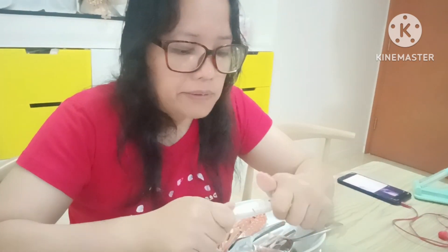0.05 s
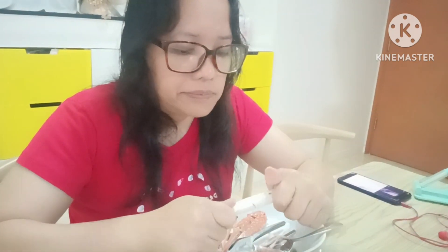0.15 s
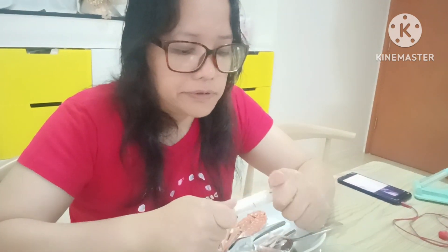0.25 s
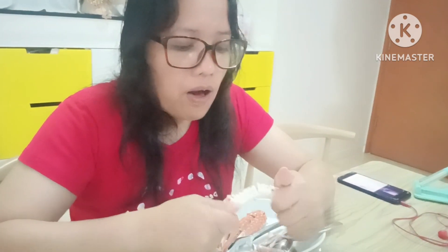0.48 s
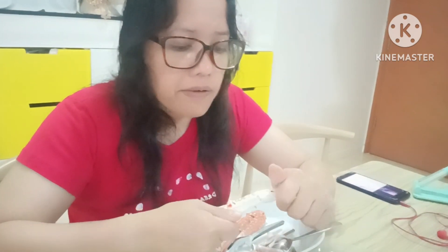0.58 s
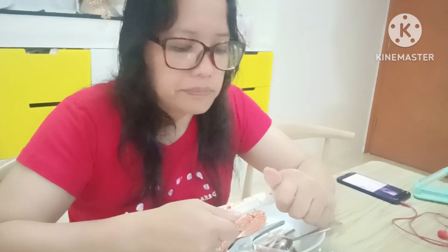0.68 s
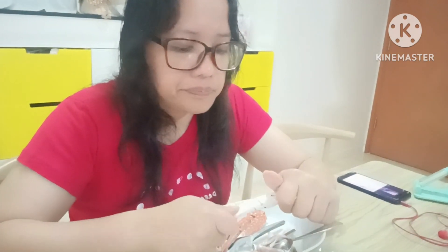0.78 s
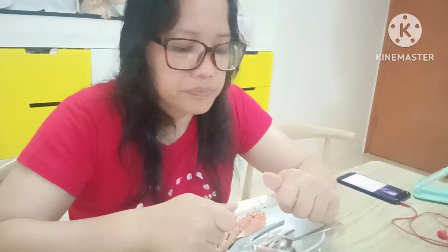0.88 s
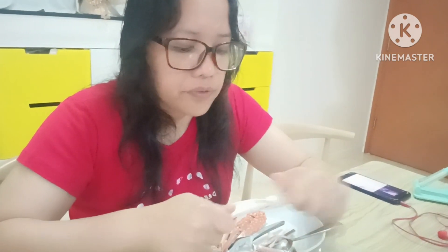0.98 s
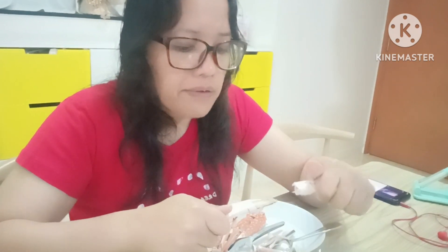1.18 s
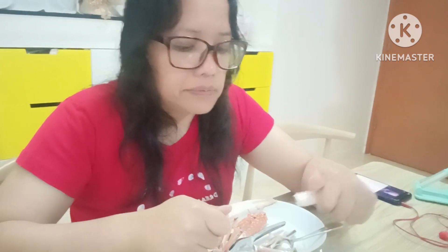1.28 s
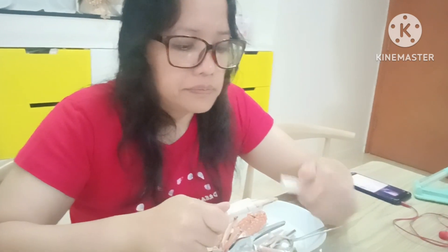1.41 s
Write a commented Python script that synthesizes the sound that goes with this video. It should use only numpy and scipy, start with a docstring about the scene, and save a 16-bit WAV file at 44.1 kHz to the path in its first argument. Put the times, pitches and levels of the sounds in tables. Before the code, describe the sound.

A cooked crab leg shell snaps sharply in the hands, with small crackles before and after

```python
"""A cooked crab leg snaps between two hands at a table, close to a phone: five fractures in 6 ms.
Each fracture rings decaying shell modes and spits noise; a hard-walled room adds a long tail and a far-wall echo.
Ticks of shell and faint rings of plate and table, shaped from filtered noise, sound before and after the snap.
The tail of an earlier crackle opens the scene. An appliance hums on wavering sine lines over patchy room noise,
and handling rustles in the treble."""
import sys
import numpy as np
from scipy import signal
from scipy.fft import rfft, irfft, next_fast_len
from scipy.io import wavfile
from scipy.ndimage import uniform_filter1d, map_coordinates

SR = 44100
rng = np.random.default_rng(int(sys.argv[2]) if len(sys.argv) > 2 else 0)


def gain_from_decibels(decibels):
    """Convert decibel values to linear amplitude factors."""
    exponent = np.asarray(decibels, float) / 20
    return 10 ** exponent


def master_out(mix):
    """Clip the mix to full scale and print it as 16-bit PCM to the path in sys.argv[1]."""
    frames = np.transpose(np.atleast_2d(mix))
    ceiling = np.clip(frames, -1, 1)
    pcm = np.round(ceiling * 32767).astype(np.int16)
    wavfile.write(sys.argv[1], SR, pcm)


N = 63945


def unit(x):
    """Scales x to rms 1."""
    return x / np.sqrt(np.mean(x ** 2) + 1e-20)


def along(points, hz):
    """Interpolates (Hz, value) points on a log frequency axis."""
    point_hz, value = np.transpose(points)
    return np.interp(np.log(hz + 1), np.log(point_hz + 1), value)


def filtered(x, response):
    """Multiplies the spectrum of x by a response of frequency."""
    size = next_fast_len(len(x) + 8192)
    hz = np.fft.rfftfreq(size, 1 / SR)
    return irfft(rfft(x, size) * response(hz), size)[:len(x)]


def wobble(knots_per_s):
    """Smooth random curve: a spline through normal draws."""
    knots = rng.standard_normal(int(N * knots_per_s / SR) + 4)
    return map_coordinates(knots, [np.arange(N) * knots_per_s / SR])


def add(track, start_s, piece):
    """Mixes a piece into the track, cut at the track's end."""
    part = track[round(start_s * SR):][:len(piece)]
    part += piece[:len(part)]


def patchy(colour, patch_db):
    """Coloured noise whose gain varies by patch_db rms in patches of time and frequency."""
    z = signal.stft(rng.standard_normal(N), nperseg=512)[2]
    field = uniform_filter1d(rng.standard_normal(z.shape), 5, axis=0)
    field = uniform_filter1d(field, 8, axis=1)
    noise = signal.istft(z * gain_from_decibels(patch_db * unit(field)), nperseg=512)[1][:N]
    return filtered(noise, lambda hz: gain_from_decibels(along(colour, hz)))


# Room noise spectrum. Each row: frequency in Hz, relative density in dB per Hz.
AIR_COLOUR = [(13, -62), (25, -30), (45, -12.5), (64, -5), (100, -7.5), (142, -10), (170, -10),
              (230, -14.5), (299, -13.5), (340, -15.5), (404, -21), (520, -20), (700, -20.5), (1000, -17.5),
              (1280, -19), (1700, -23.5), (2280, -25.5), (3000, -26.5), (3840, -39.5), (5000, -45.5),
              (6500, -54), (9260, -49.5), (15600, -59)]


def air():
    """Broad room noise, patchy and wavering in level."""
    noise = patchy(AIR_COLOUR, patch_db=1.55)
    rms_above_220_hz = np.std(filtered(noise, lambda hz: hz > 220))
    return gain_from_decibels(-54 + 0.88 * wobble(30)) * noise / rms_above_220_hz


# Appliance lines. Each row: frequency in Hz, nominal level in dB rms.
HUM_LINES = [(199.9, -53.5), (300.5, -67.5), (349.6, -67.5), (398.4, -69.5), (598.5, -69.5)]


def hum():
    """Appliance hum: sine lines wavering in level and phase."""
    waver_db, drift_rad = 1.5, 0.2
    rms_to_peak_db = 2.5  # a little under a steady sine's 3 dB
    t = np.arange(N) / SR
    out = np.zeros(N)
    for hz, rms_db in HUM_LINES:
        level = gain_from_decibels(rms_db + rms_to_peak_db + waver_db * wobble(25))
        phase = 2 * np.pi * (hz * t + rng.random()) + drift_rad * wobble(5)
        out += level * np.sin(phase)
    return out


# Rustle level curve. Each row: time in seconds, level in dB before the flutter.
RUSTLE_LEVEL = [(0, -64), (.1, -66.5), (.2, -73.5), (.6, -78.5), (.86, -79.5), (.9, -73), (.98, -70.5),
                (1.06, -73), (1.1, -75), (1.2, -78.5), (1.45, -77)]
# Rustle spectrum. Each row: frequency in Hz, relative density in dB per Hz.
RUSTLE_COLOUR = [(2060, -29.5), (3500, -3), (5220, -15.5), (6260, -22.5), (7010, -15), (8090, -8.5),
                 (9760, -0.5), (11800, -18.5), (15600, -22)]


def rustle():
    """Handling rustle: patchy treble noise on a level curve with fast flutter."""
    t = np.arange(N) / SR
    level_db = np.interp(t, *np.transpose(RUSTLE_LEVEL)) + 2.7 * wobble(120)
    return gain_from_decibels(level_db) * unit(patchy(RUSTLE_COLOUR, patch_db=2.5))


# Faint rings of plate and table, the lowest three from the table.
# Each row: start in seconds, rms level before the envelope in dB, centre in Hz,
# half-width at half amplitude in Hz, fade length in seconds.
RINGS = [(0.225, -43, 100, 30, 0.026), (.25, -51.5, 142, 25, 0.086), (.25, -51.5, 267, 60, 0.066),
         (0.443, -58, 4770, 250, 0.041), (.441, -47, 2900, 500, 0.016), (0.578, -58.5, 2450, 147, 0.066),
         (.64, -74.5, 5180, 350, .11), (.905, -71.5, 7000, 250, 0.047), (0.909, -62.5, 3900, 900, 0.055),
         (1.002, -54, 2920, 300, 0.037), (1.085, -57, 3270, 300, 0.022), (1.107, -71.5, 9100, 800, 0.043),
         (1.26, -76.5, 9300, 900, .03)]


def rings():
    """Faint rings of plate and table: narrow noisy resonances that start within 3 ms and fade."""
    t = np.arange(SR // 4) / SR
    out = np.zeros(N)
    for start_s, db, centre_hz, width_hz, fade_s in RINGS:
        noise = rng.standard_normal(len(t))
        tone = filtered(noise, lambda hz: 1 / (1 + ((hz - centre_hz) / width_hz) ** 2))
        envelope = np.clip(t / 0.003, 0, 1) * np.exp(-(t / fade_s) ** 3)
        add(out, start_s, gain_from_decibels(db) * unit(tone) * envelope)
    return out


# Room decay. Each row: frequency in Hz, t60 in seconds.
ROOM_T60 = [(300, .4), (1500, 0.51), (3400, 0.53), (6000, 0.53), (10000, 0.44), (15000, .55)]


def room(colour):
    """Room tail of energy 1: each frequency dies at its own speed, the far wall adds a late lump."""
    gap_s, rise_s = 0.004, 0.0029
    echo_s, echo_db, echo_t60_s = 0.0475, 3, 0.025  # level relative to the tail
    hz, t, z = signal.stft(rng.standard_normal(SR), SR, nperseg=256)
    decay_db = -60 * t / along(ROOM_T60, hz)[:, None]
    z = z * gain_from_decibels(along(colour, hz)[:, None] + decay_db)
    tail = signal.istft(z, SR, nperseg=256)[1][:SR]
    t = np.arange(SR) / SR
    onset = np.clip((t - gap_s) / rise_s, 0, 1)
    echo = (t > echo_s) * gain_from_decibels(echo_db - 60 * abs(t - echo_s) / echo_t60_s)
    tail = tail * onset * (1 + echo)
    return tail / np.linalg.norm(tail)


# Small ticks of cracking shell. Each row: start in seconds, rms level before the envelope in dB,
# centre in Hz, spectral width (Gaussian sigma) in octaves, fade length in seconds.
TICKS = [(.0872, -47.5, 11000, 1.8, .004), (0.44, -43, 5000, 1.1, 0.0026), (0.467, -48, 12050, .6, 0.0044),
         (0.4765, -39, 4950, 3.9, .006), (0.498, -48, 9000, 1.1, 0.0033), (.8984, -53, 5260, .3, 0.0043),
         (.8986, -55.5, 9300, .12, 0.0046), (.907, -55, 9300, .2, 0.0022), (.9155, -62, 7040, 1.1, .003),
         (.9225, -57, 7000, 1.1, .003), (.930, -61, 8030, 1.1, .003), (0.945, -55.5, 9300, 0.13, 0.0026),
         (0.95, -63, 11000, .8, .003), (1.006, -57, 2740, .4, .003), (1.0113, -58.5, 5530, 0.86, 0.0036),
         (1.0144, -50.5, 3850, .35, 0.0035), (1.02, -57, 3000, 0.4, 0.006),
         (1.026, -50, 3430, 0.24, 0.0049), (1.037, -50, 2920, 0.27, .003), (1.0715, -57, 12000, 1.4, .004),
         (1.0789, -47, 2620, 0.42, .004), (1.103, -56, 1300, 0.17, 0.0058), (1.156, -67, 4300, .2, .005)]
# Colour common to all ticks. Each row: frequency in Hz, gain in dB.
GRIT_COLOUR = [(500, -8), (1500, -0.5), (3200, 1), (5000, -4.5), (6500, -11), (8000, -6), (9800, 3),
               (11500, -4.5), (13500, -5.5), (15600, -3.5)]


def ticks():
    """Gritty noise bursts of cracking shell, each with its own colour and room answer."""
    rise_s, wet_db = 0.00024, -6.5
    t = np.arange(1024) / SR
    out = np.zeros(N)
    for start_s, db, centre_hz, width_octaves, fade_s in TICKS:
        def response(hz):
            octaves = np.log2((hz + 1) / centre_hz)
            return gain_from_decibels(along(GRIT_COLOUR, hz)) * np.exp(-0.5 * (octaves / width_octaves) ** 2)
        grit = filtered(rng.standard_normal(len(t)), response)
        envelope = np.clip(t / rise_s, 0, 1) * np.exp(-(t / fade_s) ** 3)
        burst = gain_from_decibels(db) * unit(grit) * envelope
        add(out, start_s, burst)
        flat_room = room([(100, 0)])
        add(out, start_s, gain_from_decibels(wet_db) * signal.fftconvolve(burst, flat_room))
    return out


def earlier_crackle():
    """Room tail of a crackle 0.12 s before the start, still dying away."""
    out = np.zeros(N)
    add(out, 0, gain_from_decibels(-17.5) * room(GRIT_COLOUR)[round(0.12 * SR):])
    return out


# Fractures of the snap. Each row: start in seconds, level of ring and spit together in dB.
FRACTURES = [(0.2242, -5.5), (.2256, -13), (.22658, -10.5), (0.2275, -14.5), (.2301, -25.5)]
# Shell modes. Each row: frequency in Hz, relative level in dB, t60 in seconds.
SHELL_MODES = [(106.3, -33.5, .06), (729, -14.5, 0.019), (1050, -15.5, 0.017), (1607, -10, .025),
               (2365, -12.5, 0.019), (3062, -6.5, .018), (3700, -10, .012), (4860, -11.5, .01),
               (5710, -11, .014), (7320, -12, .012), (8890, 1, 0.009), (10360, 1.5, 0.0086),
               (11300, -5.5, .009), (13000, -9, .007), (15000, -8, .007)]
# Colour of the spit and of the snap's room tail. Each row: frequency in Hz, relative density in dB per Hz.
SNAP_COLOUR = [(90, -60.5), (130, -17.5), (330, -17), (500, -29.5), (750, -21.5), (1050, -9.5), (1320, -24),
               (1650, -3.5), (1950, -14.5), (2250, -6.5), (2700, -11.5), (3100, -4), (3420, 0.5),
               (3800, -8.5), (4300, -15.5), (5000, -18), (6100, -22), (7000, -20), (8200, -18), (9000, -9),
               (9700, -4), (10300, -5.5), (10900, -16), (11800, -19), (13500, -20.5), (15600, -24.5)]


def snap():
    """Each fracture rings the shell modes anew and spits noise; one room tail answers the whole burst."""
    rise_s = 0.00008
    ring_db, spit_db, spit_t60_s = -7.5, -8, 0.0083
    wet_db = 5.5
    t = np.arange(SR // 8) / SR
    out = np.zeros(N)
    for start_s, db in FRACTURES:
        ring = np.zeros(len(t))
        for hz, mode_db, t60_s in SHELL_MODES:
            strike_db = mode_db + rng.normal(0, 1.7)
            ring += gain_from_decibels(strike_db - 60 * t / t60_s) * np.sin(2 * np.pi * hz * t)
        noise = rng.standard_normal(len(t))
        spit = unit(filtered(noise, lambda hz: gain_from_decibels(along(SNAP_COLOUR, hz))))
        burst = gain_from_decibels(ring_db) * ring + gain_from_decibels(spit_db - 60 * t / spit_t60_s) * spit
        add(out, start_s, gain_from_decibels(db) * (1 - np.exp(-t / rise_s)) * burst)
    first_s = FRACTURES[0][0]
    add(out, first_s, gain_from_decibels(wet_db) * room(SNAP_COLOUR))
    return out


def scene():
    """Sums all sources at the one microphone."""
    background = air() + hum() + rustle()
    foreground = rings() + ticks() + earlier_crackle() + snap()
    return (background + foreground)[None]


def band_limit(x):
    """A steep low-pass at the top of the band."""
    return signal.sosfilt(signal.butter(12, 16830, fs=SR, output="sos"), x)


def record(dry):
    """The phone cuts deep bass with a second-order high-pass and drops steeply above its band limit."""
    low_cut_hz, top_hz = 60, 15450

    def response(hz):
        top_db = -38 * np.clip((hz - top_hz) / 200, 0, 1)
        low_cut = (1j * hz / (1j * hz + low_cut_hz)) ** 2
        return gain_from_decibels(top_db) * low_cut

    mix = filtered(dry[0], response)[None]
    return band_limit(mix)


dry = scene()
out = record(dry)
master_out(out)
```